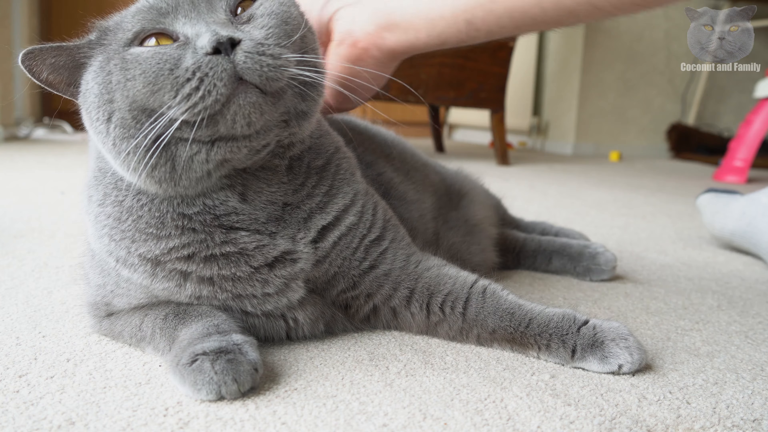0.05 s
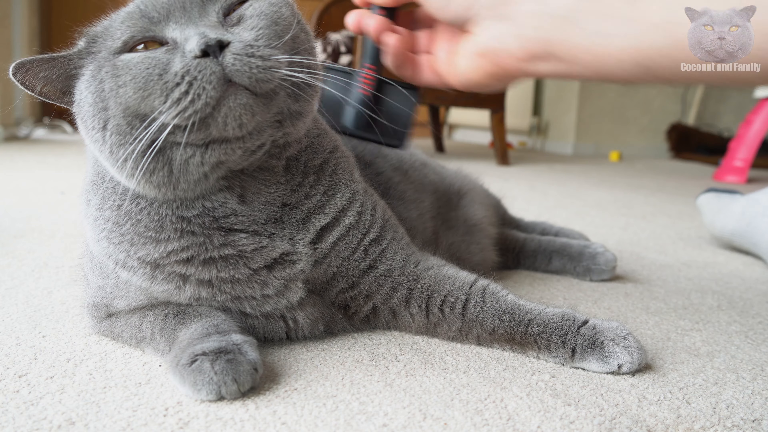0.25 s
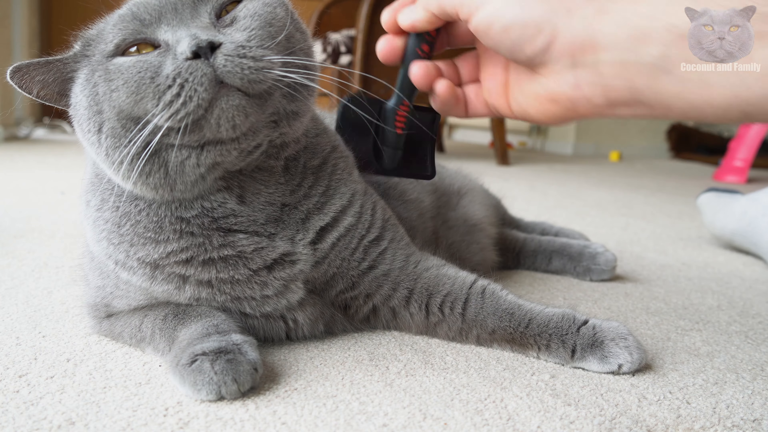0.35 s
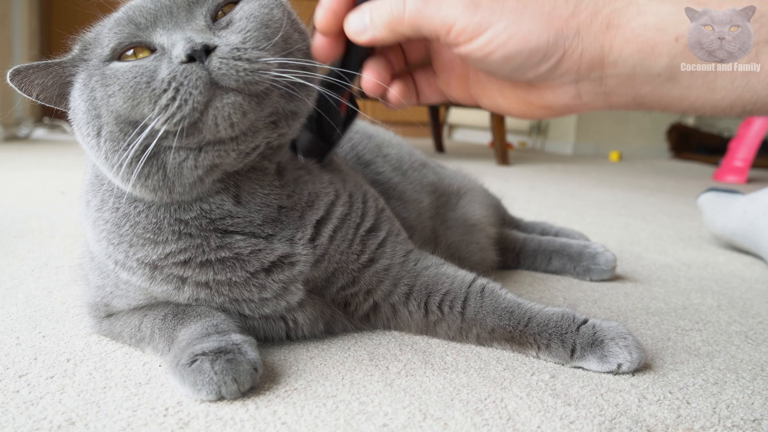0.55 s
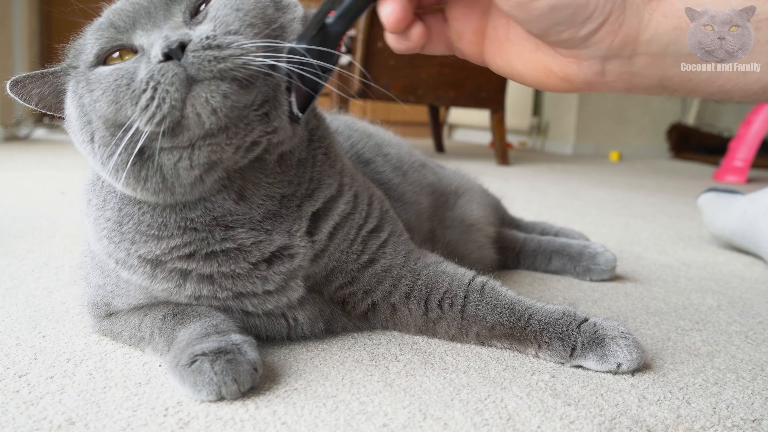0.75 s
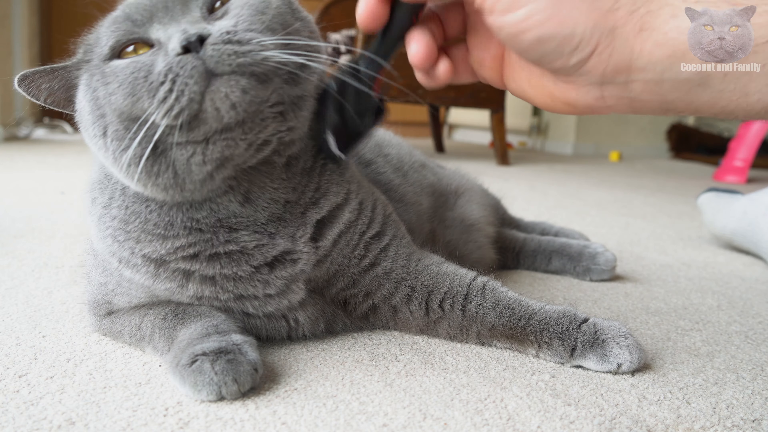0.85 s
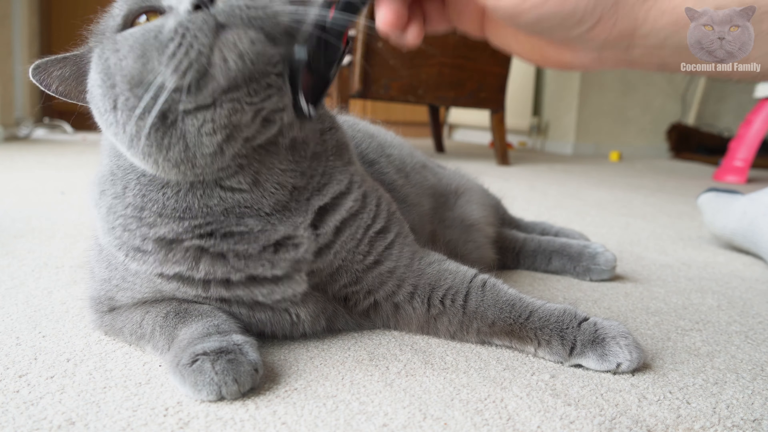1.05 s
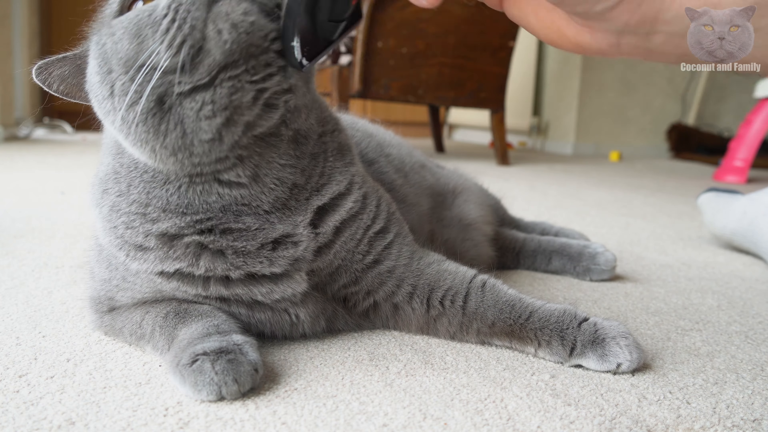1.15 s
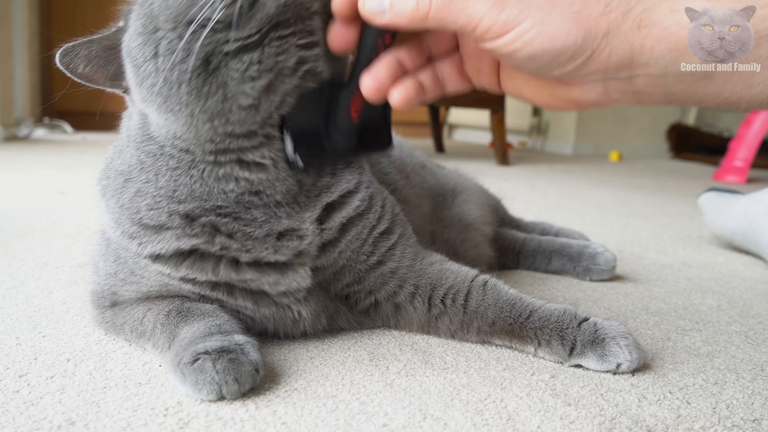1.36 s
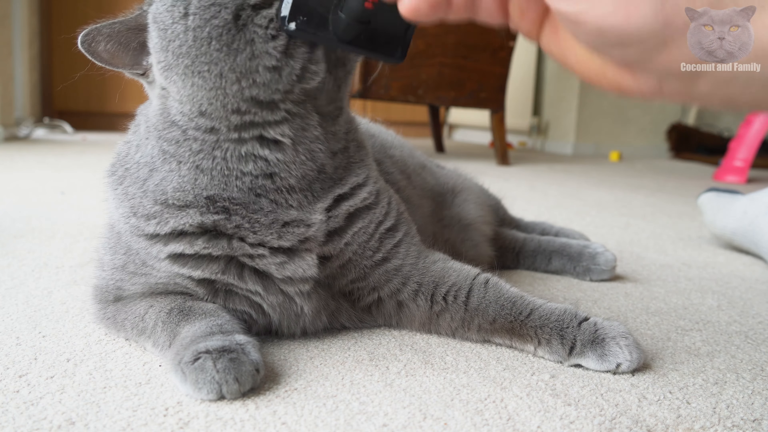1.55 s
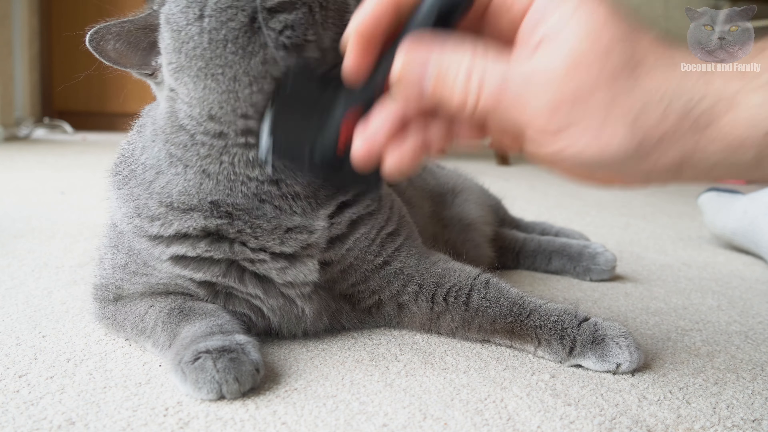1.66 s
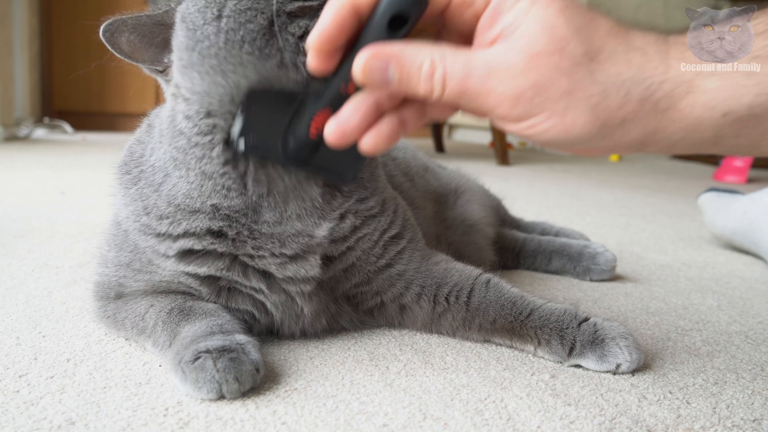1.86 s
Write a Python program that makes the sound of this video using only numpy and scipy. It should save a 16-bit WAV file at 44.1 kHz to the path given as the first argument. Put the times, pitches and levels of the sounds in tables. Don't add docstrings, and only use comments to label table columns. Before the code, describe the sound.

A cat purrs very close up, first in even low thumps, then after a short gap in a rougher, wetter rattle, while a brush swishes softly through fur in a quiet carpeted room with light hiss.

```python
import sys
import numpy as np
from scipy import signal
from scipy.fft import rfft, irfft
from scipy.io import wavfile

SR = 44100
rng = np.random.default_rng(int(sys.argv[2]) if len(sys.argv) > 2 else 0)


def wav_record(signal):
    frames = np.transpose(np.atleast_2d(signal))
    bounded = np.clip(frames, -1, 1)
    quanta = np.round(bounded * 32767).astype(np.int16)
    wavfile.write(sys.argv[1], SR, quanta)


def ratio_of_db(decibels):
    return 10 ** (np.asarray(decibels, float) / 20)


N = 83790

# time_s, level_db
OUT_EFFORT = [(0, -34), (.2, -32.5), (0.332, -36), (.455, -38), (.535, -40), (.6, -61), (.8, -46.5)]
# pitch_hz, level_db
NOSE_WHISTLE = (1345, -68)
# start_s, end_s
NOSE_WHISTLE_SPAN = (.44, .67)
# time_s, level_db, throat_hz
IN_EFFORT = [(0.902, -36, 144), (.98, -44, 159), (1.1, -41.5, 146), (1.25, -38, 155), (1.33, -41, 153),
             (1.45, -42.5, 167), (1.6, -36, 141.6), (1.75, -35.5, 140.4), (1.9, -38.5, 138)]
# share_of_cycle, level_db, scatter_ms, scatter_db
FLAPS = [
    (0, 0, .6, 1.5),
    (.47, -5, 1.5, 3),
    (.65, -3, 1.2, 2.5),
    (.82, -7, 1., 3),
]
# start_s, peak_db, pitch_hz, gulp_db
WET_TICKS = [(0.936, -40, 1080, -4), (0.949, -43, 789, -6), (0.968, -43.5, 1130, -15),
             (1.006, -44.5, 778, 4), (1.045, -42.5, 760, 8), (1.089, -53, 872, -5), (1.192, -40, 640, -13),
             (1.251, -43, 990, 3), (1.275, -38.5, 1050, -14), (1.286, -48, 840, -1), (1.331, -44.5, 603, 4),
             (1.378, -40, 837, 0), (1.412, -49, 641, -1), (1.454, -39, 727, -12), (1.472, -47, 748, -1),
             (1.514, -41.5, 720, -7), (1.548, -43, 1540, -9), (1.606, -37.5, 716, -9),
             (1.664, -42, 665, -3), (1.734, -40, 697, -20), (1.757, -50, 805, -2), (1.77, -39, 650, 4),
             (1.794, -40, 826, -13), (1.807, -39, 714, -18), (1.827, -32.5, 627, -24),
             (1.839, -48, 673, -15), (1.873, -38.5, 870, -17), (1.894, -36.5, 796, -28)]
# middle_s, half_length_s, level_db, low_share_db, high_share_db
STROKES = [
    (0, .025, -55, -7, -2.5),
    (0.112, 0.069, -66, -1, 1),
    (0.257, 0.013, -64.5, -2, 13.5),
    (.5, 0.11, -66, -9.5, -6),
    (0.672, 0.04, -66.5, -4.5, 7),
    (0.796, 0.042, -60.5, -10, 0),
    (1.166, 0.043, -52, -6, 0),
    (1.577, 0.039, -49.5, -7, -2),
    (1.702, .03, -65, -13, 7),
    (1.868, 0.026, -68.5, -8, 7),
]
# pitch_hz, width_hz, level_db
BRISTLES = [
    (1580, 574, 4),
    (3430, 800, -0.5),
    (4270, 1320, -4),
    (6030, 5700, -15.5),
]
# level_db, t60_s
HANDLE_TAP = (-28.5, .008)
# middle_s, level_db, sign, length_ms
CARPET_BUMPS = [(0.162, -28.5, -0.88, 11), (.222, -14.5, -0.73, 8), (0.266, -26.5, -1.14, 2.8),
                (0.283, -26, 0.55, 6.7), (0.319, -11.5, -0.46, 8.1), (0.402, -20.5, -0.36, 7.8),
                (0.435, -35, 0.48, 19), (0.527, -26.5, 0.67, 15), (0.567, -35.5, -0.77, 10),
                (0.622, -38, 0.85, 4.4), (0.689, -34, 0.91, 9.4), (.718, -34, -0.75, 13),
                (0.839, -44, -1, 8.3), (.89, -52, 1, 7.8)]
# pitch_hz, density_db
HISS_COLOUR = [(53, -18), (90, 1), (328, -16.5), (1170, -20.5), (1580, -21), (2720, -20.5), (3520, -20),
               (14600, -24), (15600, -23.5)]


def set_rms(x, db):
    return x * ratio_of_db(db) / np.sqrt(np.mean(x ** 2))


def ring(x, hz, width_hz):
    return signal.lfilter(*signal.iirpeak(hz, hz / width_hz, fs=SR), x)


def ring_twice(x, hz, width_hz, widen):
    return ring(ring(x, hz, width_hz), hz, widen * width_hz)


def unit_peak_gain(body):
    click = np.zeros(8192)
    click[500] = 1
    return 1 / np.abs(body(click)).max()


def click_train(times, sizes):
    i = (np.asarray(times) * SR).astype(int)
    inside = (i >= 0) & (i < N)
    return np.bincount(i[inside], np.asarray(sizes)[inside], N)


def push(x, ms):
    bell = np.exp(-.5 * (np.arange(-400, 401) / (ms * SR / 4000)) ** 2)
    return signal.fftconvolve(x, bell / bell.sum(), "same")


def wander(rate_hz):
    return set_rms(signal.lfilter(*signal.butter(2, rate_hz, fs=SR), rng.standard_normal(N)), 0)


def decay(age_s, t60_s):
    return np.exp(-np.log(1000) * age_s / t60_s)


def struck_mode(t, start_s, hz, t60_s):
    age = np.clip(t - start_s, 0, 1)
    return np.sin(2 * np.pi * hz * age) * decay(age, t60_s)


def chest(clicks):
    rung = clicks - ring(clicks, 18, 26) + ratio_of_db(0.5) * ring(clicks, 132, 34)
    return push(rung, 5.2)


def nose_whistle(t, rate_hz):
    start, end = NOSE_WHISTLE_SPAN
    hz, db = NOSE_WHISTLE
    fade = np.clip(np.minimum(t - start, end - t) / .06, 0, 1)
    flutter = 1 + 0.38 * np.cos(2 * np.pi * rate_hz * (t - .535))
    return set_rms(ring(rng.standard_normal(N), hz, 12), db) * fade * flutter


def purr_out(t):
    start_s, rate_hz, count = .0227, 25.4, 21
    scatter = rng.standard_normal((count, 2))
    time, effort_db = np.transpose(OUT_EFFORT)
    at = start_s + np.arange(count) / rate_hz + .0004 * scatter[:, 0]
    thumps = click_train(at, -ratio_of_db(np.interp(at, time, effort_db) + 1.1 * scatter[:, 1]))
    whistle = nose_whistle(t, rate_hz)
    edge_gain = ratio_of_db(-14.5) * unit_peak_gain(lambda x: ring(push(x, 1.1), 260, 180))
    edge = edge_gain * ring(push(thumps, 2.4), 285, 150)
    return edge + chest(thumps) * unit_peak_gain(chest) + whistle


def larynx_flaps():
    start_s, period_s, quicken_s, count = .9505, .0374, .0017, 27
    time, effort_db, _ = np.transpose(IN_EFFORT)
    flaps = 0
    for share, db, scatter_ms, scatter_db in FLAPS:
        scatter = rng.standard_normal((count, 2))
        cycle = np.arange(count) - 1 + share
        at = start_s + cycle * period_s - quicken_s * np.maximum(cycle - 21, 0)
        at = at + scatter_ms / 1000 * scatter[:, 0]
        size = ratio_of_db(np.interp(at, time, effort_db) + db + scatter_db * scatter[:, 1])
        flaps = flaps + click_train(at, -size * (at > .93))
    return flaps


def wet_ticks(t):
    ticks = 0
    for start, db, hz, gulp_db in WET_TICKS:
        tick = struck_mode(t, start + .001, hz, 0.0057)
        snap = .5 * struck_mode(t, start + 0.00109, 1440, 0.0024)
        gulp = ratio_of_db(gulp_db - 9.5) * struck_mode(t, start + 0.0017, 300, 0.021)
        ticks = ticks + ratio_of_db(db + 2.5) * (tick + snap - gulp)
    return signal.lfilter(*signal.butter(2, 2000, fs=SR), ticks)


def purr_in(t):
    push_ms = 1.02
    flaps = larynx_flaps()
    time, _, throat_hz = np.transpose(IN_EFFORT)
    mix = np.clip((np.interp(t, time, throat_hz) - 120) / 80, 0, 1)
    soft = push(flaps, push_ms)
    throat = (1 - mix) * ring_twice(soft, 135, 60, 4) + mix * ring_twice(soft, 200, 100, 4)
    sharp = push(flaps, 0.95)
    edge = ratio_of_db(-13) * ring(sharp, 275, 270) + ratio_of_db(-15.5) * ring(sharp, 970, 1080)
    edge = signal.lfilter(*signal.butter(2, 90, 'high', fs=SR), edge)
    gain = unit_peak_gain(lambda x: ring(push(x, push_ms), 175, 86))
    return (ratio_of_db(5.5) * throat + edge) * gain + wet_ticks(t)


def brush_strokes(t):
    count = int(6000 * N / SR)
    sizes = rng.choice([-1, 1], count) * ratio_of_db(1.8 * rng.exponential(1, count))
    grains = set_rms(click_train(rng.random(count) * N / SR, sizes), 0)
    grains = grains * ratio_of_db(0.95 * wander(34))
    bands = []
    for hz, width_hz, db in BRISTLES:
        band = set_rms(ring_twice(grains, hz, width_hz, 2.4), 0)
        bands.append(ratio_of_db(db + .5 * wander(11)) * band)
    low, middle, high = bands[0], bands[1], sum(bands[2:])
    swish = 0
    for mid, half, db, low_db, high_db in STROKES:
        swell = np.exp(-.5 * np.abs((t - mid) / half) ** 2.3)
        swish = swish + ratio_of_db(db) * swell * (ratio_of_db(low_db) * low + middle + ratio_of_db(high_db) * high)
    return swish


def handle_tap(t):
    start_s = .2548
    db, t60_s = HANDLE_TAP
    snap = click_train([start_s + .0004, start_s + .0011], [1, -.4])
    fall = (t > start_s) * decay(np.maximum(t - start_s, 0), t60_s)
    halo = ratio_of_db(-26) * rng.standard_normal(N) * fall
    return 4 * ratio_of_db(db) * signal.lfilter(*signal.butter(3, [1500, 6000], 'band', fs=SR), snap + halo)


def carpet_bumps(t):
    jolts = 0
    for mid, db, sign, ms in CARPET_BUMPS:
        jolts = jolts + sign * ratio_of_db(db) * np.exp(-.5 * ((t - mid) / (ms / 1000)) ** 2)
    return 1.73 * ring(jolts, 16, 26)


def preamp_hiss():
    hiss_db = -56.5
    f = np.maximum(np.arange(N // 2 + 1) * SR / N, 1)
    hz, db = np.transpose(HISS_COLOUR)
    colour = ratio_of_db(np.interp(np.log(f), np.log(hz), db)) * (f > 25)
    spectrum = rfft(rng.standard_normal(N)) * colour
    audible = irfft(spectrum * (f > 300) * (f < 16000), N)
    hiss = irfft(spectrum, N) * ratio_of_db(hiss_db) / np.std(audible)
    return hiss + set_rms(ring(rng.standard_normal(N), 3140, 600), hiss_db - 15.5)


def room_rumble():
    rumble_db = -52
    deep = set_rms(ring_twice(rng.standard_normal(N), 29, 45, 1), rumble_db)
    upper = set_rms(ring_twice(rng.standard_normal(N), 57, 40, 1), rumble_db - 4.5)
    return (deep + upper) * ratio_of_db(2 * wander(3.3))


def scene():
    t = np.arange(N) / SR
    cat = purr_out(t) + purr_in(t)
    brush = brush_strokes(t) + handle_tap(t)
    background = carpet_bumps(t) + preamp_hiss() + room_rumble()
    return (cat + brush + background)[None]


def top_cut(x):
    return signal.sosfilt(signal.butter(12, 15740, fs=SR, output="sos"), x)


def record(dry):
    return top_cut(dry)


dry = scene()
out = record(dry)
wav_record(out)
```